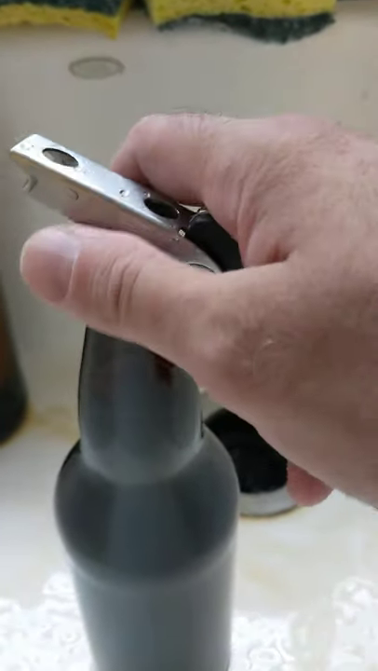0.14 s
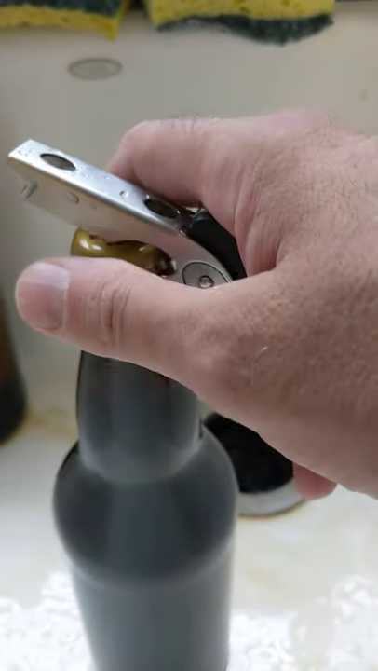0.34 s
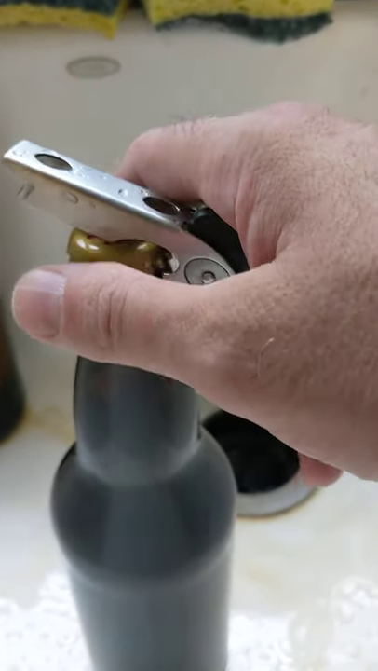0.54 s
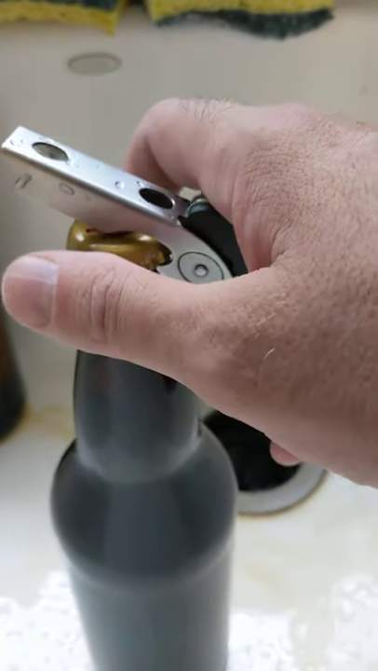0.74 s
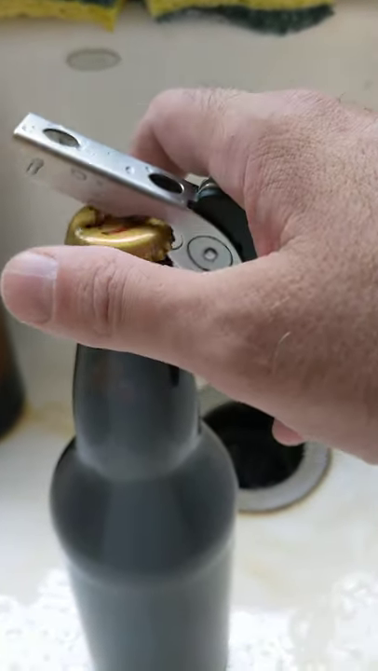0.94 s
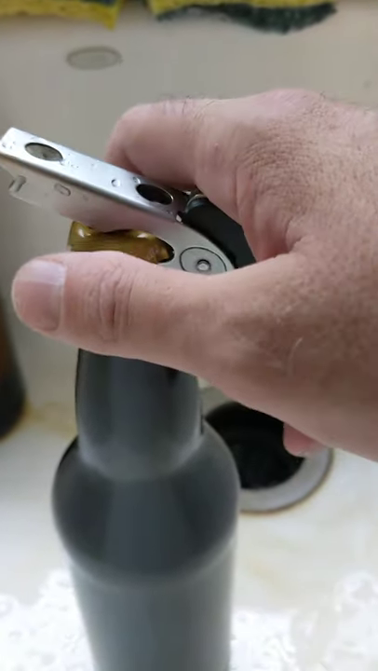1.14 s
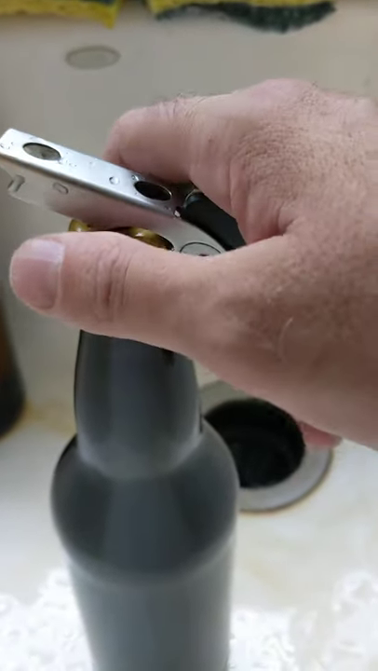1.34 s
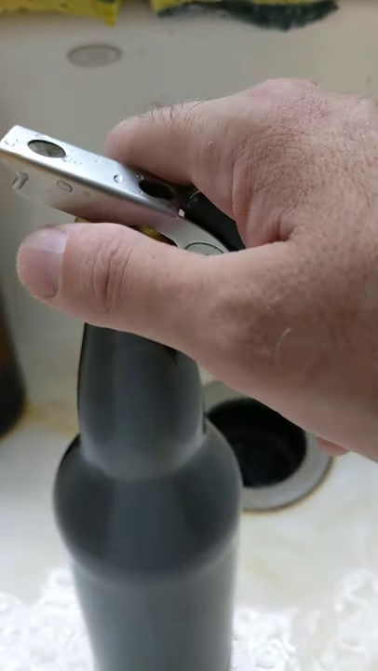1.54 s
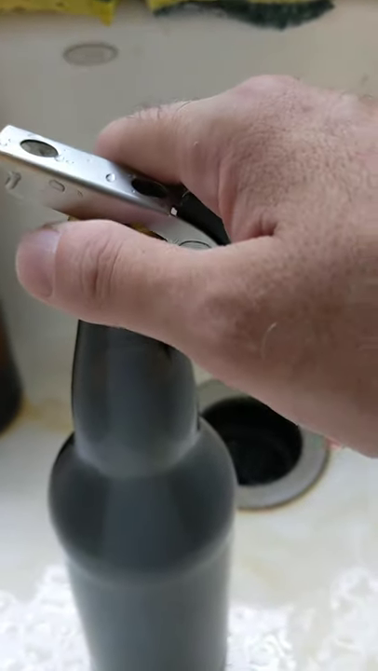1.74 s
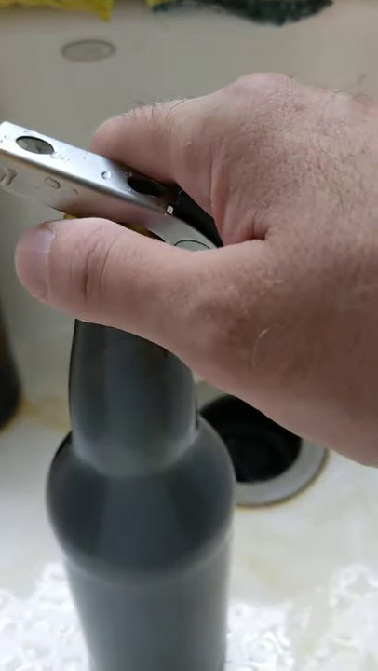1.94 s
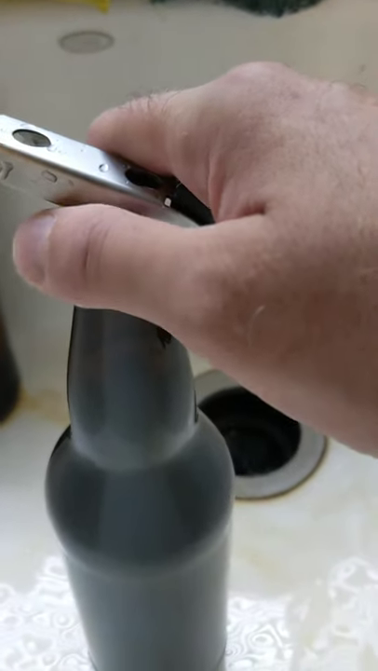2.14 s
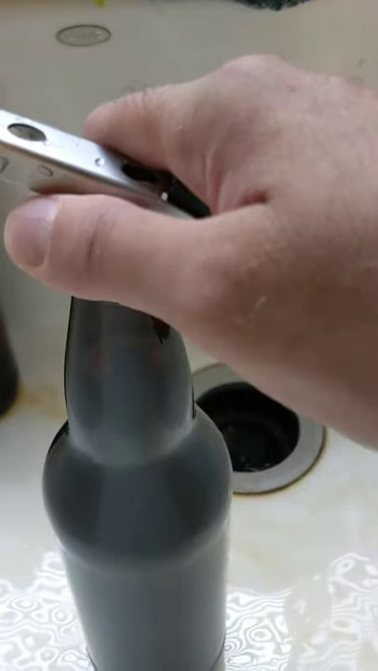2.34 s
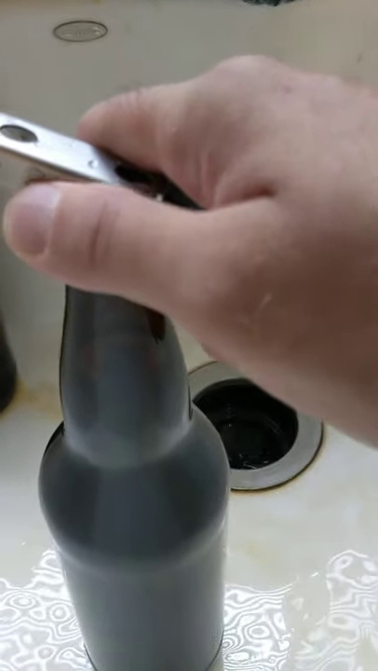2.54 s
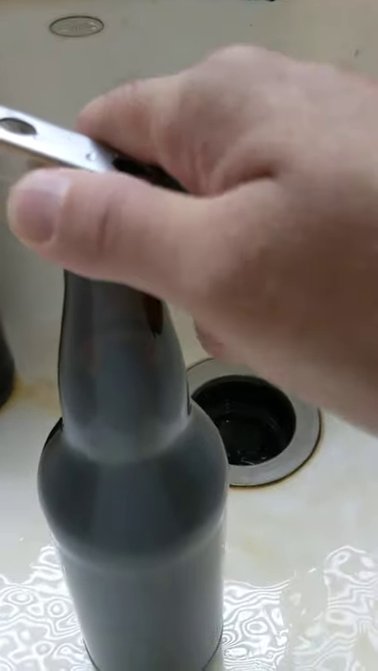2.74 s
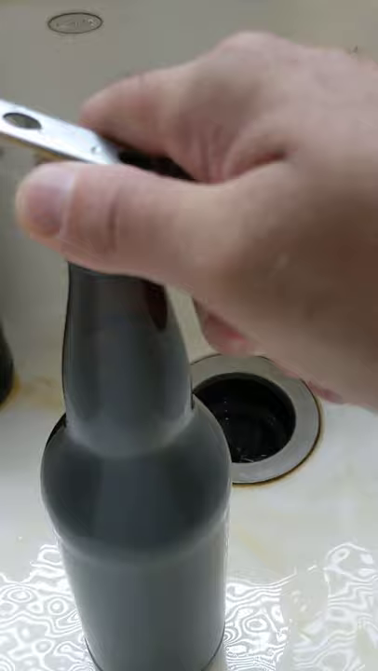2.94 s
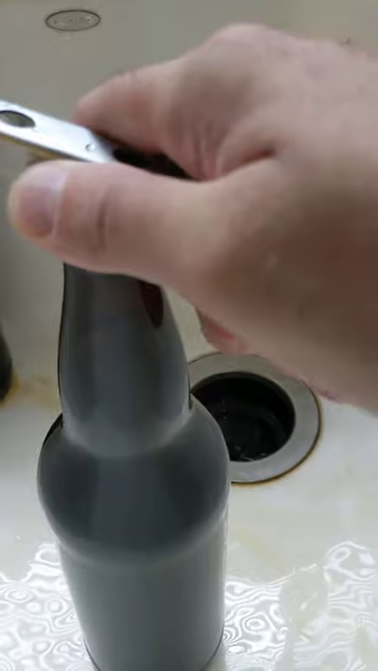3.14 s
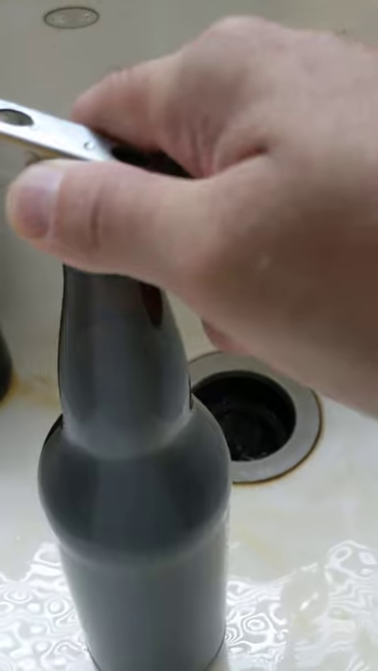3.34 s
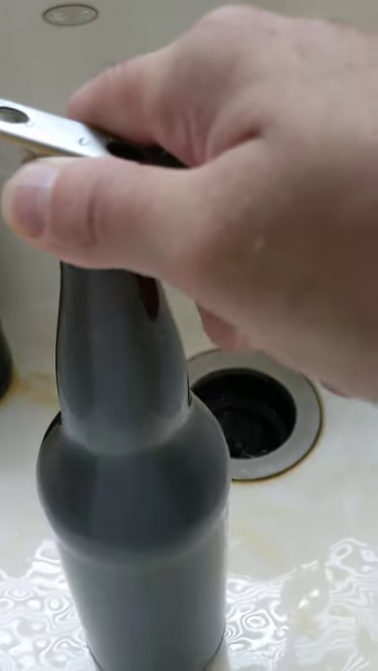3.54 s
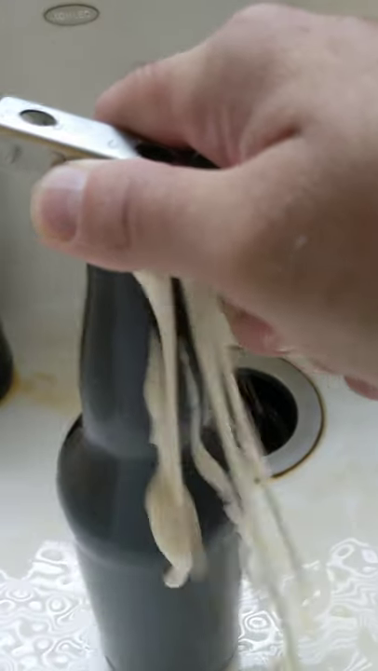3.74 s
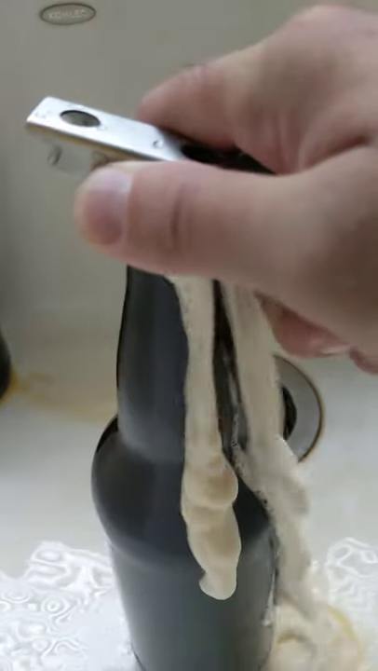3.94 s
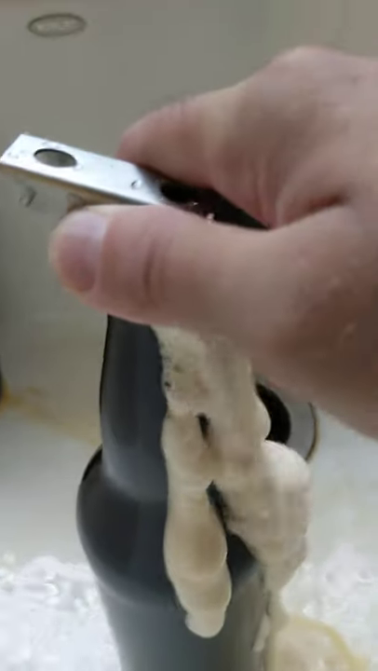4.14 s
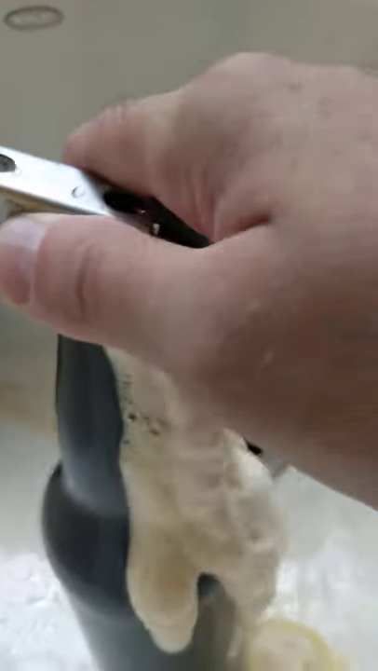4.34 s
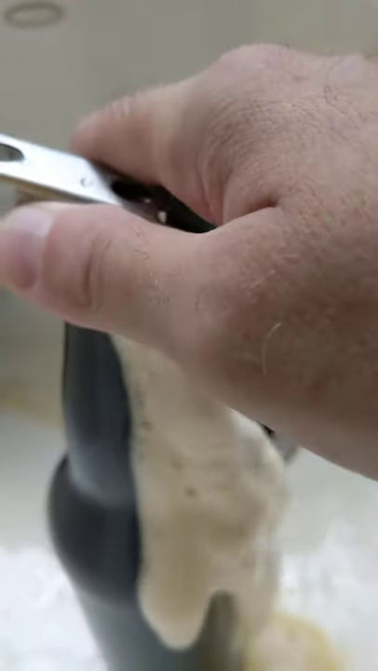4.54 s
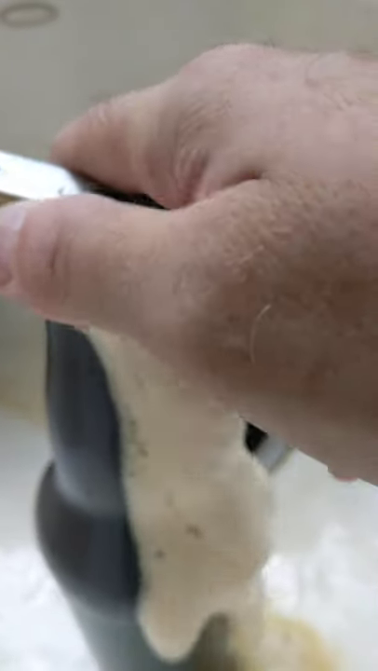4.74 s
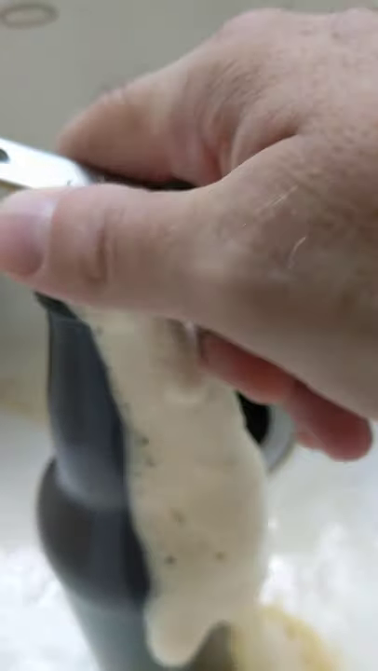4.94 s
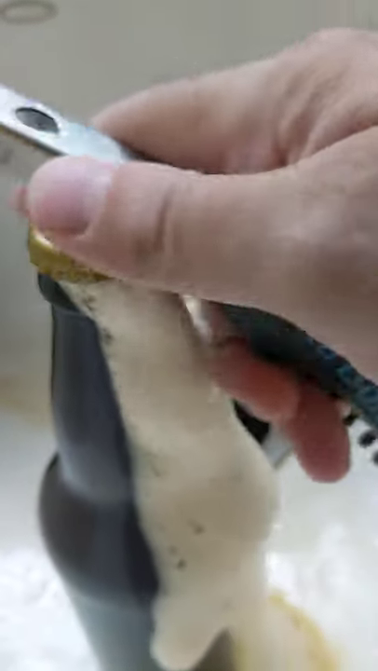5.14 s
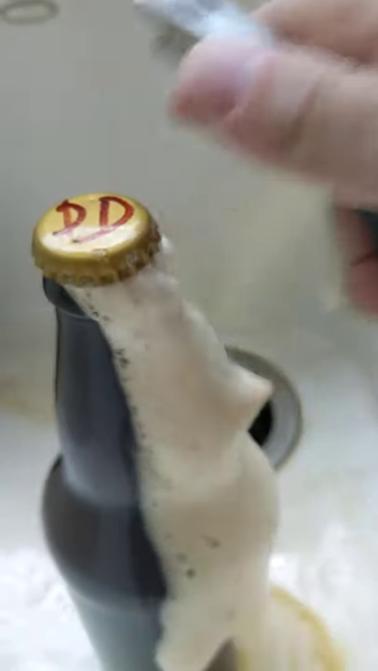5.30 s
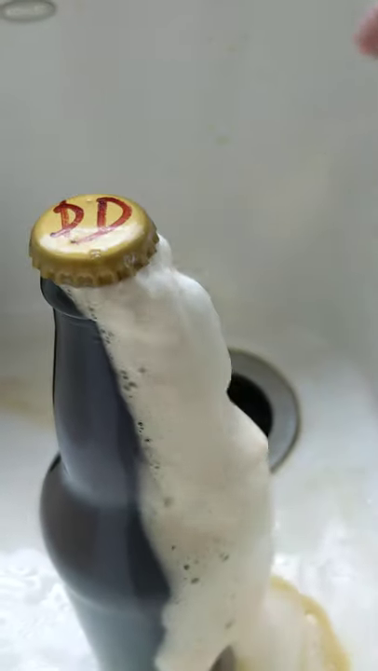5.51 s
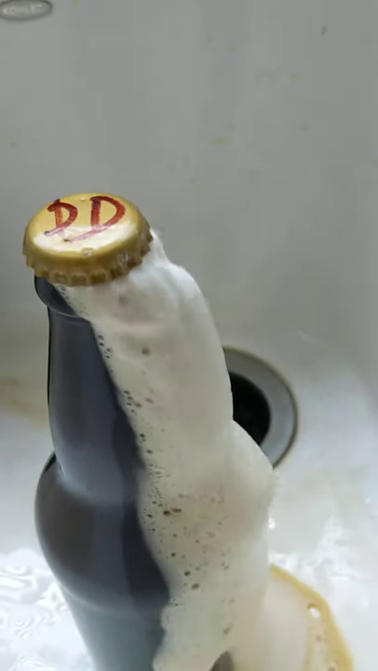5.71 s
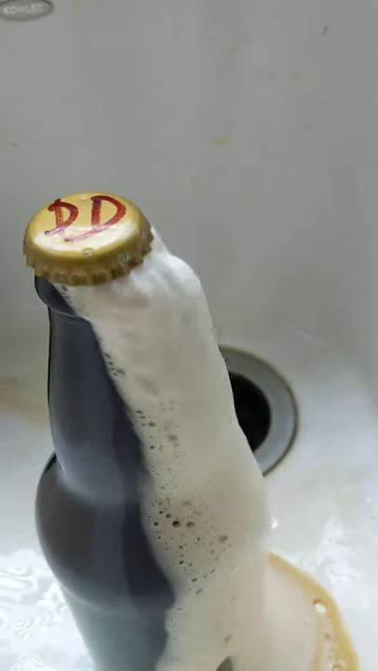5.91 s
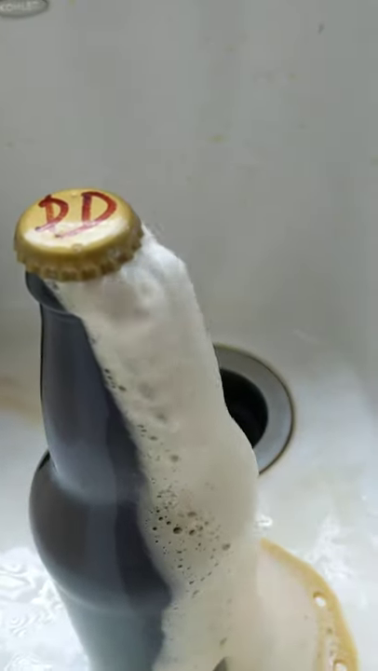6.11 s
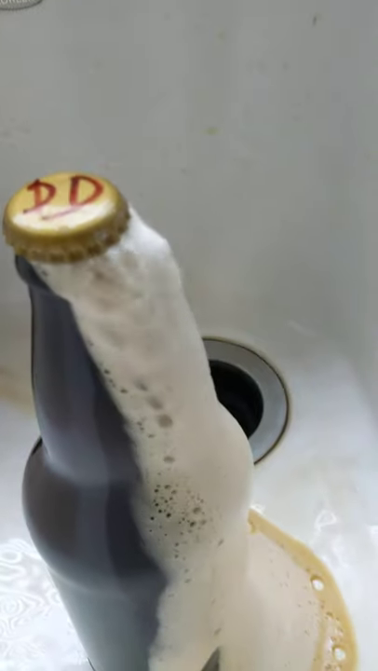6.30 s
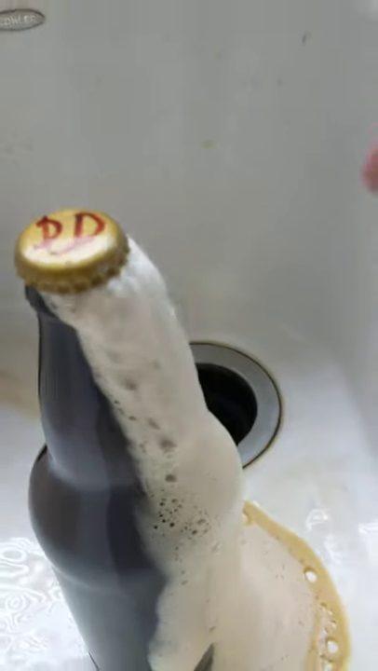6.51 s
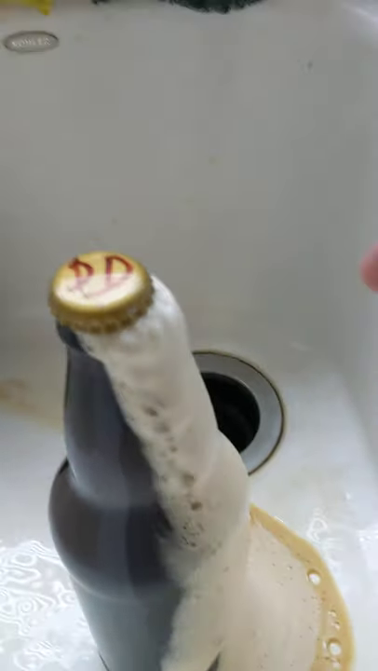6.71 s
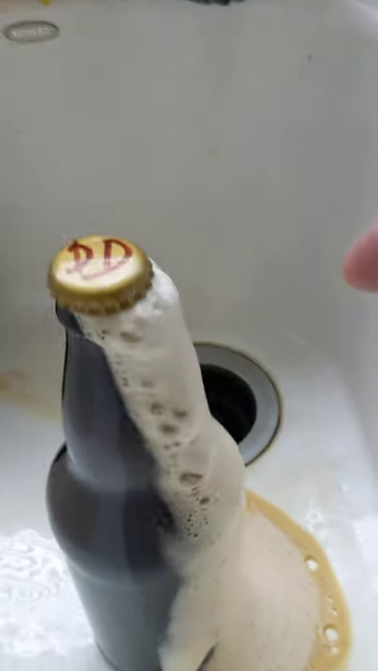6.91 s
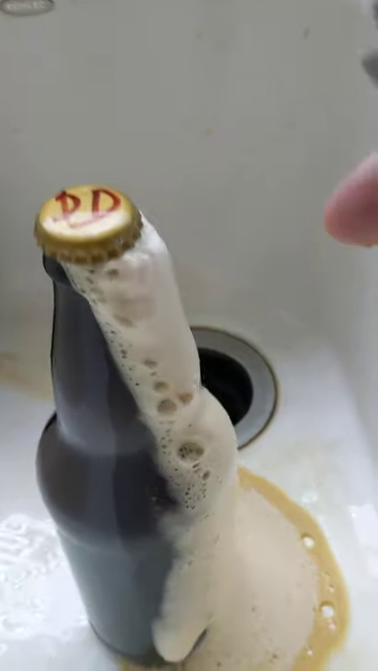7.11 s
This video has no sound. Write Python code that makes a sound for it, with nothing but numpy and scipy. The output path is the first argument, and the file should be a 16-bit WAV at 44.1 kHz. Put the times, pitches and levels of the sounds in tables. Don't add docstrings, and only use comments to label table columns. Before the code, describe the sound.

A hand fumbles an opener onto a capped bottle: soft knocks, tiny sharp ticks, bright metallic clinks and short scrapes ring in a hard basin. It goes nearly quiet over low room hum. Then high-pitched gas leaks for about a second, the bottle thuds, and foam bursts out, slapping the sink and hissing steadily with a wet spray and late wavering whistly swells. Close microphone, slightly stronger on the left.

```python
import sys
import numpy as np
from scipy import signal
from scipy.fft import rfft, irfft
from scipy.io import wavfile

SR = 44100
rng = np.random.default_rng(int(sys.argv[2]) if len(sys.argv) > 2 else 0)


def ratio_of_db(decibels):
    return 10 ** (np.asarray(decibels, float) / 20)


def dump_mix(stems):
    frames = np.atleast_2d(stems).T
    limited = np.clip(frames, -1, 1)
    pcm = np.round(limited * 32767).astype(np.int16)
    wavfile.write(sys.argv[1], SR, pcm)


N = 320166
TIME_S = np.arange(N) / SR
HZ = np.fft.rfftfreq(N, 1 / SR) + 1e-3
LEFT_RIGHT = np.array([[1], [-1]])


def rms_one(x):
    return x / np.sqrt(np.mean(x ** 2) + 1e-20)


def in_time(rows):
    s, *columns = np.transpose(rows)
    return [np.interp(TIME_S, s, c) for c in columns]


def at_hz(points, axis=1):
    return np.interp(np.log(HZ), np.log(np.array(points)[:, 0]), np.array(points)[:, axis])


def drift(rate_hz):
    r = np.exp(-80 * np.pi * rate_hz / SR)
    slow = signal.lfilter([1], [1, -2 * r, r * r], rng.standard_normal(N // 40 + 2002))[2000:]
    return np.interp(np.arange(N) / 40, np.arange(len(slow)), rms_one(slow))


def sounding(rows):
    start, end = rows[0][0], rows[-1][0]
    return np.interp(TIME_S, [start - .02, start, end, end + 0.017], [0, 1, 1, 0])


def swells(rows, rise_db_per_s, fall_db_per_s):
    level_db = np.full(N, -150.)
    for s, length, db in rows:
        rise = rise_db_per_s * np.maximum(s - TIME_S, 0)
        fall = fall_db_per_s * np.maximum(TIME_S - s - length, 0)
        level_db = np.maximum(level_db, db - rise - fall)
    return level_db


# (frequency [Hz], likeness [0-1])
ROOM_LIKENESS = [(60, 1), (240, 0.62), (950, 0.24), (3770, 0), (15000, 0.06)]
# (frequency [Hz], likeness [0-1], left lag [rad], left gain [dB])
FLOW_PORTS = [(100, .9, 0.2, -7), (350, 0.8, 0.83, 2.5), (520, .55, 1.25, -0.5), (680, 0.42, 2.1, 3),
              (930, .3, 0.93, 4.5), (1300, 0.62, 0.04, 4), (1710, 0.1, 1.36, -0.5), (2150, .55, 3, -1.5),
              (2630, 0.22, 1.5, 0.5), (3550, 0.13, 1, 1.5), (5930, 0, 2.5, -3.5), (7300, 0.01, 2, -0.5)]


def hiss(colour, extra_db=0, grain_db=0, share=None):
    grain = ratio_of_db(grain_db * rng.exponential(1, N))
    mid, left, right, lone = rfft(rng.standard_normal((4, N)) * grain)
    in_basin = share is not None
    alike = np.clip(at_hz(FLOW_PORTS if in_basin else ROOM_LIKENESS), 0, 1)
    share = np.clip(share or 0, 0, 1)
    lag = np.exp(-1j * in_basin * at_hz(FLOW_PORTS, axis=2))
    common = np.sqrt(alike) * mid
    apart = np.sqrt((1 - alike) * (1 - share))
    alone = np.sqrt((1 - alike) * share) * lone
    rows = np.array([common * lag + apart * left, common + apart * right, alone])
    band = (HZ > colour[0][0]) & (HZ < colour[-1][0])
    rows = irfft(rows * band * ratio_of_db(at_hz(colour) + extra_db), N)
    return rows / np.sqrt(np.mean(rows[:2] ** 2) + np.mean(rows[2] ** 2))


def strike(times, levels_db, modes, contact_s, spread_db=0, rough=1):
    out, n = np.zeros(N), np.arange(600)
    for hz, mode_db, t60 in modes:
        force = np.zeros(N) + 1e-18
        r, w = ratio_of_db(-60 / (t60 * SR)), 2 * np.pi * hz / SR
        for s, db in zip(times, levels_db):
            rattle = 1 - rough + rough * rng.standard_normal(600)
            push = rattle * n * np.exp(-n / (contact_s * SR))
            drive = np.abs(push @ np.exp(1j * w * n)) + rough * 0.59 * np.sqrt(push @ push)
            force[round(s * SR):][:600] += push / drive * ratio_of_db(db + mode_db + spread_db * rng.normal())
        out += signal.lfilter([0, np.sin(w)], [1, -2 * r * np.cos(w), r * r], force)
    return out


def echoes(t60):
    n = np.arange(8000)
    tail = rng.standard_normal((2, 8000)) * ratio_of_db(-60 * n / (t60 * SR)) * (1 - np.exp(-n / 60.))
    return tail / np.sqrt(np.sum(tail ** 2) / 2)


def basin(x, t60, wet_db):
    return x + ratio_of_db(wet_db) * signal.fftconvolve(x[None], echoes(t60), axes=1)[:, :N]


def by_way_of_basin(rows, t60, turns_per_s):
    angle = 2 * np.pi * turns_per_s * TIME_S
    paths = sum(signal.oaconvolve((rows[2] * swing)[None], echoes(t60), axes=1)[:, :N]
                for swing in (np.cos(angle), np.sin(angle)))
    return irfft(rfft(rows[:2] + paths) * ratio_of_db(at_hz(FLOW_PORTS, axis=3) / 2 * LEFT_RIGHT), N)


# (frequency [Hz], width [Hz], level [dB])
WHISTLES = [(666, 18, 34), (725, 39, 27), (1252, 28, 4), (1380, 40, 20), (2920, 210, 22), (4300, 240, -30),
            (4660, 27, 6), (5080, 41, 26), (5540, 16, 23), (6730, 40, -12), (7250, 17, -21),
            (8500, 18, -32), (9740, 1300, 14), (10300, 47, 14), (13900, 49, -8), (14700, 41, -11)]


def leak(gate, levels_db, colours, pan_db, gain_db, wet):
    whistle_db = wet * sum((2.5 + 0.23 * db) / (1 + (2 * (HZ - hz) / width) ** 2)
                           for hz, width, db in WHISTLES)
    sputter_db = .5 * drift(33.0) + 0.52 * drift(37)
    parts = 0
    for db, colour in zip(levels_db, colours):
        level = ratio_of_db(db + sputter_db + .5 * drift(2.8))
        parts = parts + level * hiss(colour, whistle_db, grain_db=1.5, share=0.73)
    heard = by_way_of_basin(gate * parts, t60=0.1, turns_per_s=0.356)
    return heard * ratio_of_db(gain_db + pan_db / 2 * LEFT_RIGHT)


# (frequency [Hz], density [dB per Hz])
AIR = [(41, -34), (70, -18), (91, -33), (109, -16.5), (261, -28.5), (289, -18.5), (339, -22.5),
       (475, -30.5), (704, -38), (839, -34), (877, -42), (1640, -48.5), (2300, -61.5), (2990, -91),
       (5060, -120)]


def room_tone():
    return ratio_of_db(-46.5 - 5.0 + 0.6 * drift(5.9)) * hiss(AIR)[:2]


HUM_HZ = [18.55, 37.4, 39.4, 56.0, 58.08, 61.6, 120, 300.4]
HUM_DB = [-46, -65, -56, -62, -37.7, -60, -58, -66]


def refrigerator():
    t = TIME_S + np.array([[0], [.0007]])
    return sum(np.sqrt(2) * ratio_of_db(db + 0.89 * drift(0.62)) * np.sin(2 * np.pi * (hz * t + rng.random()))
               for hz, db in zip(HUM_HZ, HUM_DB))


# (time [s], length [s], level [dB], brightness [dB])
STROKES = [
    (0, 0.23, -64, -6.5),
    (.3, 0.062, -69, -17),
    (.57, 0.089, -64.5, -14),
    (.69, 0.11, -59, -17),
    (.96, .015, -62, -20),
    (1.06, .1, -57.5, -15),
    (1.14, .12, -61.5, -9),
    (1.3, .19, -71.5, 0.5),
    (1.75, 1, -72, -10),
    (2.05, .02, -67, -17),
]
# (frequency [Hz], density [dB per Hz])
RUB_LOW = [(1500, -14), (2600, 3), (3100, 5), (3600, 5.5), (4500, 4), (5200, 2.5), (5700, 7), (8500, -17)]
# (frequency [Hz], density [dB per Hz])
RUB_HIGH = [(6500, -6), (8000, -7), (9600, 4), (10600, -6), (11600, 0), (12700, -11), (15900, -10)]


def rub():
    rows = STROKES + [(0, 2.9, -81, -2)]
    low_rows = [(s, length, db) for s, length, db, _ in rows]
    high_rows = [(s, length, db + bright_db) for s, length, db, bright_db in rows]
    low_db = swells(low_rows, rise_db_per_s=240, fall_db_per_s=190)
    high_db = swells(high_rows, rise_db_per_s=240, fall_db_per_s=190)
    low = ratio_of_db(low_db - 3.5) * hiss(RUB_LOW, grain_db=2.5)
    high = ratio_of_db(high_db + 2.5) * hiss(RUB_HIGH, grain_db=3.0)
    return (low + high)[:2]


# (time [s], boom [dB], knock [dB], ping [dB])
KNOCKS = [(0.025, -70, -50, -53), (0.059, -58, -63, -64), (0.168, -36.5, -46.5, -60),
          (0.312, -48, -51.5, -61), (0.666, -50, -39.5, -42), (0.672, -38, -37, -53),
          (0.726, -59, -52, -58), (.91, -64, -59, -59), (1.06, -48, -44.5, -44.5), (1.08, -53, -42, -65),
          (1.094, -59, -39.5, -54), (1.178, -38.5, -44.5, -56), (1.194, -39.5, -43, -54),
          (1.239, -56, -54, -53), (1.481, -42, -46.5, -60), (2.06, -66, -70, -68)]
# (frequency [Hz], level [dB], t60 [s])
FLOOR_MODES = [(241, 0, 0.29)]
# (frequency [Hz], level [dB], t60 [s])
WALL_MODES = [(436, -13.5, 0.055), (536, 0, 0.054), (581, 0.5, 0.055), (670, -6.5, 0.044)]
# (frequency [Hz], level [dB], t60 [s])
BOTTLE_MODES = [(1139, 4, 0.042), (1360, -15, 0.082)]


def knocks():
    s, boom_db, knock_db, ping_db = np.transpose(KNOCKS)
    boom = strike(s, boom_db - 3.0, FLOOR_MODES, contact_s=0.00031, rough=0)
    low = strike(s, knock_db - 0.5, WALL_MODES, contact_s=0.00014, spread_db=4.0, rough=0)
    low += strike(s, ping_db - 0.5, BOTTLE_MODES, contact_s=.0001, spread_db=0.5, rough=0)
    return boom + basin(low, t60=0.15, wet_db=-1)


# (time [s], opener ring [dB], cap ring [dB])
CLINKS = [(0.0255, -53, -58.5), (0.0594, -59, -78), (0.665, -37, -32.5), (0.6738, -40, -43),
          (.82, -55, -62), (0.723, -62, -53), (0.964, -58, -68), (1.0607, -31, -48), (1.0748, -45, -58),
          (1.0937, -36, -32), (1.1006, -39, -43), (1.239, -51, -69), (2.0597, -58, -75)]
# (frequency [Hz], density [dB per Hz])
CRACK = [(1300, -38), (2500, -6), (3400, 0), (4000, -13), (5900, 3), (7300, 0), (8500, -8), (9700, 0),
         (11200, -5), (12800, -14), (15000, -17), (15900, -20)]


def jangle():
    shake = 0
    for s, opener_db, cap_db in CLINKS:
        decay_db = 60 * np.abs(TIME_S - s) / 0.045
        shake = shake + ratio_of_db(max(opener_db - 7, cap_db) - 6 - decay_db) * (TIME_S >= s)
    return shake * hiss(CRACK, grain_db=-4.5)[0]


# (frequency [Hz], level [dB], t60 [s])
OPENER_MODES = [(2580, -4.5, 0.076), (2880, -15.5, 0.043), (2683, -22.5, 0.49), (3010, -4, 0.029),
                (3900, -12, 0.0079), (3320, -6, 0.044), (3400, -27, 0.18), (4100, -13, 0.25),
                (4150, -28, 0.19), (4340, -18.5, .35), (4350, -26, 0.13), (4685, -33, 0.17)]
# (frequency [Hz], level [dB], t60 [s])
CAP_MODES = [(5140, -8.5, 0.045), (5180, -8, 0.072), (6030, -16, 0.074), (5560, 0, 0.0078),
             (6440, -15, 0.0089), (5740, -28, 0.13), (6200, -20, 0.1), (6900, -25, 0.064),
             (7200, -7, 0.044), (7380, -17, 0.094), (7760, -10, 0.071), (7690, -25, 0.1),
             (8500, -16, 0.006), (9250, -18, .09), (9515, -20, 0.092), (9680, -15, 0.098),
             (10760, -22, 0.099), (11500, -11, 0.0065), (14900, -24, .06)]


def clinks():
    s, opener_db, cap_db = np.transpose(CLINKS)
    high = strike(s, opener_db + 0.5, OPENER_MODES, contact_s=0.0017, spread_db=0.5)
    high += strike(s, cap_db + 5.5, CAP_MODES, contact_s=0.0016, spread_db=3.0)
    soft_top = signal.butter(2, 14000, fs=SR, output="sos")
    return basin(signal.sosfilt(soft_top, high) + jangle(), t60=0.26, wet_db=-2.5)


# (time [s], level [dB])
NECK_BLOWS = [
    (.167, -57),
    (1.06, -51),
    (1.093, -53),
    (1.14, -54),
    (1.181, -53),
    (1.225, -58),
    (2.06, -62),
]
# (frequency [Hz], level [dB], t60 [s])
NECK_MODES = [(1502, -6, 0.3), (1450, -12, 0.3)]


def neck_ring():
    return strike(*np.transpose(NECK_BLOWS), NECK_MODES, contact_s=.0001, rough=0)


# (time [s], peak [dB], frequency [Hz])
TICKS = [
    (.647, -46, 5200),
    (0.4033, -27, 11500),
    (0.407, -32, 12000),
    (0.54, -41, 9300),
    (0.547, -28, 6160),
    (0.547, -31, 8930),
    (3.652, -16, 10600),
]


def ticks():
    slips = sum(strike([s], [db - 0.5], [(hz, 0, .002), (1.02 * hz, -6, .002), (1.1 * hz, -6, .002)],
                       contact_s=0.0003) for s, db, hz in TICKS)
    return basin(slips, t60=0.1, wet_db=-6)


# (time [s], length [s], level [dB], frequency [Hz])
SQUEAKS = [
    (.94, 0.049, -67, 5250),
    (.96, 0.023, -63, 3300),
    (1.028, .025, -58, 3000),
    (1.052, .008, -58, 4400),
    (.81, 0.013, -66, 4200),
]


def squeaks():
    shape = [(-2, -25), (-.5, -4), (0, 0), (.5, -4), (2, -25)]  # (widths from centre, dB)
    out = 0
    for s, length, db, hz in SQUEAKS:
        colour = [(hz * (1 + k * 0.075), d) for k, d in shape]
        out = out + ratio_of_db(swells([(s, length, db)], 900, 390)) * hiss(colour, grain_db=3.0)[:2]
    return out


# (time [s], jet [dB])
VENT = [
    (2.67, -82),
    (2.712, -40),
    (2.754, -27),
    (2.994, -28.5),
    (3.278, -28.5),
    (3.638, -41.5),
    (3.654, -31.5),
    (3.672, -52),
    (3.72, -57),
]
# (frequency [Hz], density [dB per Hz])
GAS_LOW = [(400, -14.5), (1000, -20), (1600, -16), (2200, -13), (2900, -11), (3800, -6.5), (4400, -4),
           (5500, 0), (6400, -3), (7200, -15)]
# (frequency [Hz], density [dB per Hz])
GAS_JET = [(6200, -24), (7000, -11), (7600, -5), (8200, -7.5), (8900, -2.5), (9700, 1.5), (10300, -4.5),
           (10700, -9), (11200, -32)]
# (frequency [Hz], density [dB per Hz])
FINE = [(10000, -31), (10700, -4), (11400, -2), (12400, -7.5), (13100, -14.5), (13900, -4), (14400, -12),
        (15900, -10.5)]


def gas():
    jet_db, = in_time(VENT)
    swing_db = jet_db + 28
    low_db = -40 + 0.88 * swing_db
    fine_db = -29.5 + 1.64 * swing_db + 1.0 * (TIME_S - VENT[0][0])
    levels_db = (low_db, jet_db, fine_db)
    return leak(sounding(VENT), levels_db, (GAS_LOW, GAS_JET, FINE), pan_db=1.8, gain_db=2.5, wet=0.1)


# (from [s], to [s], frequency [Hz], width [Hz])
BAND_GAPS = [
    (2.7, 3.698, 2140, 260),
    (4.05, 5.65, 2436, 260),
]


def with_band_gaps(x):
    for start, end, hz, width in BAND_GAPS:
        active = np.clip(np.minimum(TIME_S - start, end - TIME_S) / 0.055, 0, 1)
        depth = np.clip(.6 + .45 * drift(5.0), 0, 1) * active
        x = x - depth * irfft(rfft(x) / (1 + (2 * (HZ - hz) / width) ** 6), N)
    return x


# (time [s], level [dB])
BUMP = [
    (3.653, -1),
    (3.661, 8),
    (3.673, -7),
    (3.69, -16),
]
# (frequency [Hz], level [dB], t60 [s])
THUD_MODES = [(103, -39, 0.11), (228, -41, 0.042), (284, -30.5, 0.056), (540, -47, 0.02),
              (1370, -47, 0.017)]


def bump():
    thud = strike(*np.transpose(BUMP), THUD_MODES, contact_s=0.0004, rough=0)
    return basin(thud, t60=0.11, wet_db=0)


# (time [s], flow [dB], pressure as jet over spray [dB])
BURST = [(3.67, -41, -2), (3.73, -39.5, 1), (3.79, -30.5, 7), (3.84, -26, 2), (3.92, -29.5, 5),
         (4.05, -32.5, 4), (4.25, -29.5, 2.5), (4.45, -31.5, 2.5), (4.9, -31, 3), (5.0, -32.5, 5.5),
         (5.7, -31.5, 7), (5.99, -29.5, 3), (6.4, -28, 0), (6.53, -28.5, -4), (6.62, -32, -3.5),
         (7.26, -31.5, -1.5)]
# (frequency [Hz], density [dB per Hz])
GUSH = [(120, -8.5), (300, -17.5), (520, -10), (680, -8), (950, -11), (1380, -4), (1700, -7.5),
        (2000, -5.5), (2350, -17)]
# (frequency [Hz], density [dB per Hz])
SPRAY = [(2000, -12.5), (2450, -6), (3000, -2), (3500, -2), (4200, 5.5), (4700, 1.5), (5600, 3.5),
         (6300, -4.5), (7500, -55)]
# (frequency [Hz], density [dB per Hz])
JET = [(5600, -1), (6600, -5), (7300, 0), (8100, -2), (9600, -1), (10400, -6), (11200, -36)]


def foam():
    flow_db, pressure_db = in_time(BURST)
    since = TIME_S - BURST[0][0]
    climb_db = 77 * np.maximum(3.837 - TIME_S, 0)
    gush_db = -45 + 0.19 * (flow_db + 29.5) + 0.92 * since - climb_db
    pinch_db = 6.5 * np.exp(-((TIME_S - 5.58) / 0.55) ** 2)
    fine_db = flow_db - 6.5 + 0.71 * pressure_db + pinch_db
    levels_db = (gush_db, flow_db - 0.3, flow_db + pressure_db, fine_db)
    return leak(sounding(BURST), levels_db, (GUSH, SPRAY, JET, FINE),
                pan_db=1.5 + 0.45 * since, gain_db=2.0, wet=0.83)


# (time [s], peak [dB], frequency [Hz])
SPLATS = [
    (3.805, -28, 770),
    (3.823, -23, 690),
    (3.848, -22.5, 810),
    (3.867, -21, 640),
    (3.856, -22, 560),
    (3.858, -28, 200),
    (3.815, -40, 190),
    (3.887, -31, 900),
    (3.906, -39, 790),
]


def slaps():
    hits = sum(strike([s], [db + 0.5], [(hz, -2, .018), (0.58 * hz, -9, .012), (1.35 * hz, -5, .015)],
                      contact_s=0.0023) for s, db, hz in SPLATS)
    return basin(hits, t60=0.11, wet_db=0)


# (time [s], length [s], level [dB])
SWELLS = [
    [(5.9, .02, -38), (6.1, 0.27, -36), (6.63, 0.019, -34), (6.74, 0.022, -29.5), (6.8, 0.21, -33),
     (7.04, 0.11, -32), (7.18, .08, -31)],
    [(5.89, .02, -36), (6.13, .06, -35), (6.3, 0.051, -44), (6.63, .02, -45), (6.74, .02, -34),
     (7.04, 0.071, -31), (7.16, .1, -28.5)],
    [(5.89, .05, -32), (6.46, 0.085, -47), (6.77, .03, -33), (6.9, 0.014, -31), (7.25, .02, -48)],
]
# (frequency [Hz], width [Hz])
SONG_TONES = [(3250, 940), (4130, 290), (5620, 63)]


def song():
    parts = 0
    for rows, (hz, width) in zip(SWELLS, SONG_TONES):
        tone = [(hz - 2 * width, -25), (hz - width / 2, -4), (hz, 0), (hz + width / 2, -4), (hz + 2 * width, -25)]
        level_db = swells(rows, rise_db_per_s=120, fall_db_per_s=220)
        parts = parts + ratio_of_db(level_db) * hiss(tone, share=1.0)
    return by_way_of_basin(parts, t60=0.19, turns_per_s=0.291)


def scene():
    background = room_tone() + refrigerator()
    handling = rub() + knocks() + clinks() + neck_ring() + ticks() + squeaks()
    flow = with_band_gaps(gas() + foam() + song())
    return background + handling + flow + bump() + slaps()


def band_limit(x):
    return signal.sosfilt(signal.butter(12, 15830, fs=SR, output="sos"), x)


# (frequency [Hz], density [dB per Hz])
SELF_NOISE = [(1180, -28), (2000, -10), (2560, -5.5), (2710, -6.5), (3560, -3.5), (4520, -9), (5540, -7.5),
              (12500, -20), (15900, -22)]
# (frequency [Hz], left minus right [dB])
PORTS = [(60, 2), (130, 2.5), (290, 4), (640, 5), (1410, 5.5), (3100, 6), (6820, 8), (15000, -0.5)]


def record(dry):
    x = dry + ratio_of_db(-67.5 - 2.5) * hiss(SELF_NOISE)[:2]
    ports = irfft(ratio_of_db(at_hz(PORTS) / 2 * LEFT_RIGHT), N)
    ports = np.roll(ports, 1000, axis=1)[:, :2001]
    x = signal.oaconvolve(x, ports, mode="same", axes=1)
    return band_limit(x)


dry = scene()
out = record(dry)
dump_mix(out)
```